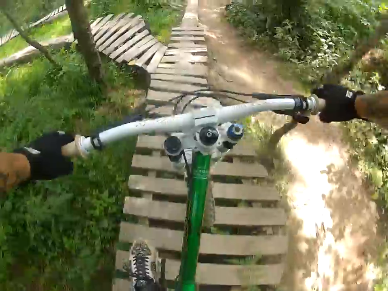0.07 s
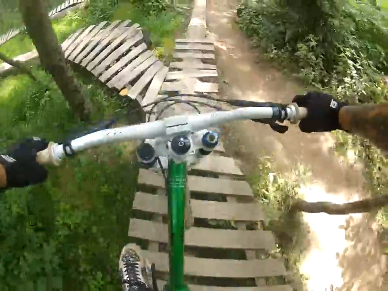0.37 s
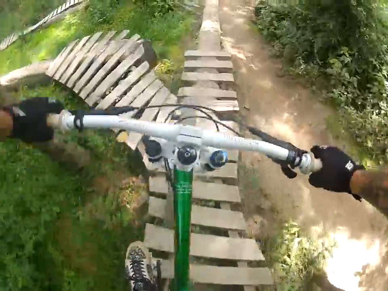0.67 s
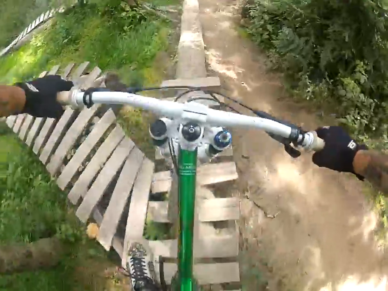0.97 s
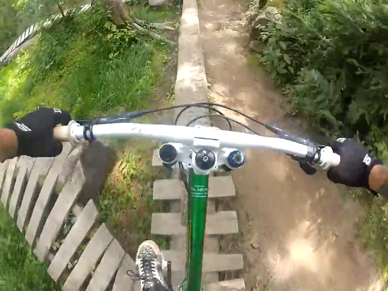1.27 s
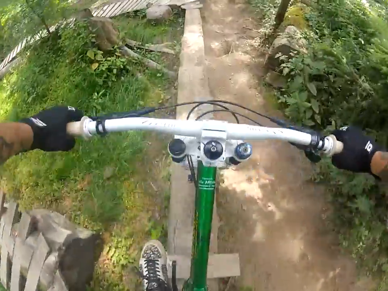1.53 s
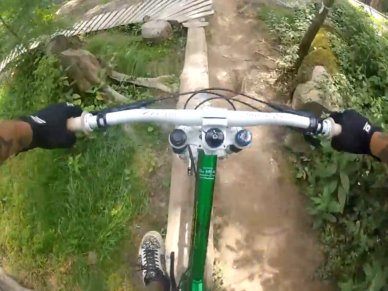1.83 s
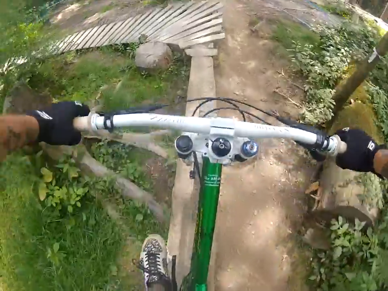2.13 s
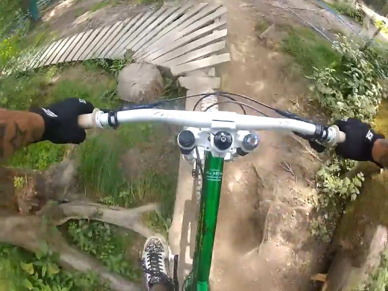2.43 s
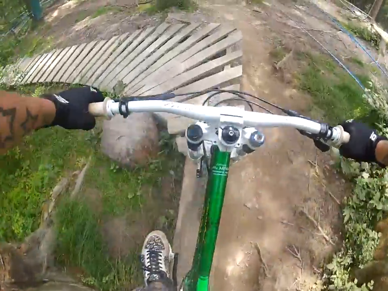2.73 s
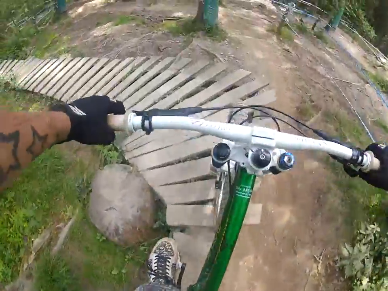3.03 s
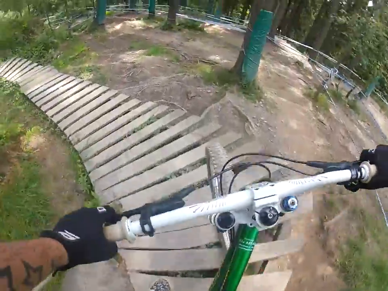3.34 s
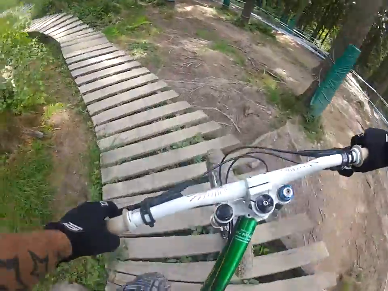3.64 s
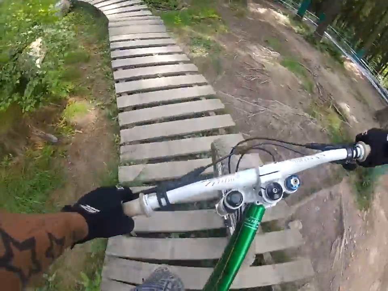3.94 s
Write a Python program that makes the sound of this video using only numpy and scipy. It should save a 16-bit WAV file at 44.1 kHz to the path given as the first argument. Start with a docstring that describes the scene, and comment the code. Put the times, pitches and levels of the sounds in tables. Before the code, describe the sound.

A mountain bike rolls over a slatted wooden bridge and a narrow plank, its tyres droning and scuffing. Irregular knocks, thumps and faint freewheel ticks come throughout, with low wind rumble on a microphone worn by the rider.

```python
"""Mountain bike on a wooden bridge

A bike rolls over slats and a narrow plank, heard from a camera in a closed case on the rider.
Wind and rolling tyres rumble, and the wheels set the boards into damped vibration. Friction and impact
excite resonances: tyres scuff, the chain rasps, the freewheel ticks, metal clinks, bike and mount knock.
The case rings above the bass, and the recorder's sample-and-hold mirrors the sound into the treble."""
import sys
import numpy as np
from scipy.fft import rfft, irfft, next_fast_len
from scipy.io import wavfile
from scipy.ndimage import map_coordinates

SR = 44100
rng = np.random.default_rng(int(sys.argv[2]) if len(sys.argv) > 2 else 0)


def generate_wav(signal):
    """Clip the signal to [-1, 1] and save it as 16-bit WAV at the path in sys.argv[1]."""
    frames = np.transpose(np.atleast_2d(signal))
    scaled = np.clip(frames, -1, 1) * 32767
    pcm = np.round(scaled).astype(np.int16)
    wavfile.write(sys.argv[1], SR, pcm)


N = 176400


def amp(db):
    """Amplitude grows tenfold for every 20 dB."""
    return 10 ** (np.asarray(db) / 20)


def unit(x):
    """Normalisation to an rms of 1."""
    return x / np.sqrt(np.mean(x ** 2) + 1e-20)


def curve(rows):
    """Linear interpolation of (seconds, value) rows at every sample."""
    return np.interp(np.arange(N) / SR, *np.transpose(rows))


def wobble(rate):
    """Smooth random modulation: a spline through rate knots a second."""
    return map_coordinates(rng.standard_normal(int(N * rate / SR) + 4), [np.arange(N) * rate / SR])


def swell(middle, length):
    """A bell-shaped power envelope, its middle and length in seconds."""
    return np.exp(-abs(2 * (np.arange(N) / SR - middle) / length) ** 3)


def filtered(x, response):
    """Linear filtering multiplies the spectrum by a frequency response."""
    n = x.shape[-1]
    padded = next_fast_len(n + n // 4)
    return irfft(rfft(x, padded) * response(np.fft.rfftfreq(padded, 1 / SR)), padded)[..., :n]


def noise(spectrum):
    """Spectral shaping of white noise by (Hz, dB) rows, at an rms of 1."""
    hz, db = np.transpose(spectrum)
    white = rng.standard_normal(N)
    return unit(filtered(white, lambda f: amp(np.interp(np.log(f + 1), np.log(hz), db))))


def resonate(x, modes, steepness=1.67):
    """Parallel resonators of alternating sign, scaled so that white noise keeps its power."""
    def response(f):
        total = sum((-1) ** k * amp(db) * (1j * f * width / (hz * hz - f * f + 1j * f * width))
                    ** steepness for k, (hz, width, db) in enumerate(modes))
        return total / np.sqrt(np.mean(abs(total) ** 2))
    return filtered(x, response)


def add(track, start, sound):
    """Superposition of a sound on the track, from start in seconds."""
    part = track[max(round(start * SR), 0):][:len(sound)]
    part += sound[:len(part)]


def ring_down(t, t60, rise_s):
    """Damping: after a quick rise, the amplitude decays by 60 dB every t60 seconds."""
    return np.exp(-np.log(1000) * t / t60) * (1 - np.exp(-t / rise_s))


def contact(modes, fall_s, tilt=0, pitch=1):
    """Impact excitation: a snap, a crunch and a faint chatter ring the modes; tilt brightens them."""
    t = np.arange(SR // 16) / SR
    snap = 0.73 * (t == 0)
    chatter = 0.15 * np.exp(-t / 0.015)
    crunch = (np.exp(-t / fall_s) + chatter) * rng.standard_normal(len(t))
    force = filtered(snap + crunch / np.linalg.norm(crunch), lambda f: (1j * f / (4990 + 1j * f)) ** tilt)
    ring = resonate(force, [(pitch * hz, width, db) for hz, width, db in modes])
    return ring / np.linalg.norm(ring) * np.sqrt(0.006 * SR)  # the energy of 6 ms at rms 1


def hiss():
    """Stereo difference: faint noise, given opposite signs in the two channels, adds width."""
    spectrum = [(30, -48), (100, -4.5), (600, -1), (1200, -19.5), (2600, -20.5), (3700, -6), (5000, -8)]
    return amp(-77.5) * noise(spectrum)


# Spectrum of the air. Each row: frequency in Hz, relative density in dB.
AIR_SPECTRUM = [(200, -17.5), (450, -2.5), (700, -4), (1100, -4), (1500, -11.5), (2200, -8), (3000, -11.5),
                (4200, -14.5), (5400, -15.5), (6000, -15)]

def air():
    """Broadband noise with slight amplitude modulation makes a soft rush of air."""
    return amp(-63.5 + 0.96 * wobble(18)) * noise(AIR_SPECTRUM)


# Envelopes of the shaking case and the rolling tyres. Each row: time in seconds, relative level in dB.
SHAKE_LEVELS = [(0, -45), (.85, -50), (1.03, -38.5), (1.15, -46), (1.58, -40), (1.75, -47.5), (2.35, -43.5),
                (2.5, -51.5), (2.97, -44), (3.15, -54.5), (3.6, -52), (4, -49)]
ROLL_LEVELS = [(0, -59), (.26, -48), (.36, -56), (.52, -52.5), (.62, -53), (.92, -55.5), (1.03, -49.5),
               (1.15, -54), (1.28, -52), (1.7, -54), (2.1, -56.5), (2.9, -55.5), (3.07, -53), (3.22, -54),
               (3.42, -53.5), (3.65, -58), (3.84, -54), (3.95, -56.5)]
# Their spectra. Each row: frequency in Hz, relative density in dB.
SHAKE_SPECTRUM = [(5, -15), (13, -1.5), (25, -1), (40, -13.5), (60, -13), (100, -28), (250, -71),
                  (600, -120)]
ROLL_SPECTRUM = [(30, -3.5), (70, -4.5), (110, 0.5), (200, -9.5), (270, -10), (400, -19), (1500, -63)]

def rumble():
    """Random forcing: the case shakes in the wind while the tyres drone unevenly over the boards."""
    shake = amp(3.5 + curve(SHAKE_LEVELS)) * noise(SHAKE_SPECTRUM)
    roll = amp(0.5 + curve(ROLL_LEVELS) + 1.2 * wobble(25.95)) * noise(ROLL_SPECTRUM)
    return shake + roll


# Pings of the bike's metal parts. Each row: start in seconds, level in dB.
METAL_PINGS = [(1.43, -57.5), (1.61, -57), (1.958, -54)]

def pings(ring_hz=3940, width_hz=1400):
    """Impacts on light metal parts excite one broad, high resonance, which dies quickly."""
    out = np.zeros(N)
    for start, db in METAL_PINGS:
        add(out, start, amp(db) * contact([(ring_hz, width_hz, 0)], fall_s=0.0065))
    return out


# Modes of struck metal. Each row: frequency in Hz, level in dB, 60 dB decay time in seconds.
CLINK_MODES = [(1750, -43, 0.027), (2320, -40.5, 0.086), (3200, -41, 0.024), (4500, -44, .025),
               (5362, -41.5, 0.03)]

def clink(start=1.9848):
    """Free vibration: metal strikes metal once, and the least damped inharmonic mode sings on."""
    out, t = np.zeros(N), np.arange(SR // 10) / SR
    for hz, db, t60 in CLINK_MODES:
        phase_drift = 0.097 * np.cumsum(rng.standard_normal(len(t)))  # roughens the tone
        tone = np.sin(2 * np.pi * hz * t + phase_drift)
        add(out, start, amp(db) * tone * ring_down(t, t60, rise_s=0.0012))
    return out


# Rasps of the chain. Each row: middle in seconds, length in seconds, level in dB.
CHAIN_RASPS = [(.655, 0.12, -60), (1.3, .034, -55), (1.73, 0.12, -68)]

def chain(ring_hz=3560, width_hz=200):
    """Narrowband resonance: the dense rattle of dragging links drives one metallic mode."""
    power = sum(amp(db) ** 2 * swell(middle, length) for middle, length, db in CHAIN_RASPS)
    links = unit(np.exp(0.28 * wobble(300))) * rng.standard_normal(N)
    return resonate(np.sqrt(power) * links, [(ring_hz, width_hz, 0)])


# Resonances of a pawl's tick. Each row: frequency in Hz, width in Hz, relative gain in dB.
PAWL_MODES = [(1750, 370, -11.5), (2377, 147, 7.5), (3090, 220, -13.5), (4730, 270, -11.5),
              (5300, 370, -16)]
# The clear ticks, and the envelope of the faint ones between. Each row: time in seconds, level in dB.
CLEAR_TICKS = [(.2154, -51.5), (0.2726, -52.5), (1.1262, -55), (2.1784, -56.5), (2.3356, -54),
               (3.9769, -58.5)]
FAINT_TICK_LEVELS = [(.5, -63), (1, -60), (2.1, -63), (3.2, -66), (3.55, -60)]

def freewheel(ticks_per_s=33, spread_db=1.8):
    """A quasi-periodic impulse train: the pawls tick with scatter in timing, level and pitch."""
    jitter, loudness, detunes = rng.standard_normal((200, 3)).T
    times = (np.arange(len(jitter)) + 0.24 * jitter) / ticks_per_s
    levels = np.interp(times, *np.transpose(FAINT_TICK_LEVELS)) + spread_db * loudness
    clear_times = np.array(CLEAR_TICKS)[:, 0]
    faint_ticks = [(start, db) for start, db in zip(times, levels)
                   if abs(start - clear_times).min() > 0.5 / ticks_per_s and start < N / SR]
    out = np.zeros(N)
    for (start, db), detune in zip(CLEAR_TICKS + faint_ticks, detunes):
        add(out, start, amp(db) * contact(PAWL_MODES, fall_s=0.0035, pitch=1 + 0.026 * detune))
    return out


# Resonances of the boards, and of the case in low, middle and high groups.
# Each row: frequency in Hz, width in Hz, relative gain in dB.
BOARD_MODES = [(137, 75, 0.17), (273.7, 120, -1.2)]
CASE_LOW = [(688, 152, 2.5), (896, 180, -8.5), (1144, 300, 2.5)]
CASE_MID = [(1825, 200, 3), (2333, 333, -4.5)]
CASE_HIGH = [(2955, 240, -1.5), (3564, 330, 4), (4520, 78, -14.5), (4990, 780, -9)]
# Scuffs of tyres and gear. Each row: middle in seconds, length in seconds, relative level in dB,
# offsets of the low and high groups in dB.
SCUFF_STROKES = [(0.432, 0.07, -56, -7.5, -10), (0.562, 0.015, -50.5, -4, -11),
                 (0.649, 0.12, -55.5, -3, -7), (0.779, 0.027, -56.5, 0, -3), (0.987, 0.032, -56, 0, -2.5),
                 (1.048, 0.07, -62.5, 1.5, -3), (1.28, 0.084, -57, -2, -9), (1.309, 0.019, -48.5, -5, -14),
                 (1.433, 0.016, -57.5, -1, -3), (1.659, 0.029, -55, -1.5, -7),
                 (1.742, 0.12, -59.5, -2, -7.5), (1.886, 0.05, -60, -1, -3), (2.119, 0.029, -63, 4, 1),
                 (2.333, 0.088, -65.5, 0.5, -2), (2.519, 0.021, -65.5, 9, 3),
                 (2.644, 0.057, -54.5, -1, -26), (2.884, 0.21, -61, -0.5, -5), (3.079, 0.13, -62, 2, -6.5),
                 (3.305, 0.061, -58.5, 1, -7), (3.42, 0.073, -63.5, 5.5, -6.5),
                 (3.817, 0.049, -53, 0, -7.5)]

def scuffs():
    """Friction noise, swelling in strokes over a light steady rub, drives the case and the boards."""
    rub_db = -65.5 + np.array([-7.5, 0, -6.5])  # low, middle and high groups
    trim_db = np.array([-3, -1, 0])
    power = np.outer(amp(rub_db), amp(0.5 * wobble(6.8))) ** 2
    for middle, length, db, low_db, high_db in SCUFF_STROKES:
        group_db = db + trim_db + np.array([low_db, 0, high_db])
        power += np.outer(amp(group_db) ** 2, swell(middle, length))
    envelopes = np.sqrt(power)
    grain = unit(np.exp(0.28 * wobble(500)))
    boom = amp(3) * resonate(envelopes[0] * rng.standard_normal(N), BOARD_MODES)
    case = sum(resonate(envelope * grain * rng.standard_normal(N), modes)
               for envelope, modes in zip(envelopes, (CASE_LOW, CASE_MID, CASE_HIGH)))
    return boom + case


# Knocks of bike and mount. Each row: start in seconds, level of the case's middle group in dB,
# offsets of its low and high groups in dB.
KNOCK_HITS = [(0.4493, -43, -17, -3), (0.5407, -48, -8, -15), (.732, -53.5, -11, -2.5),
              (1.4212, -49, -11, -20), (1.539, -53, -9, -11), (1.5745, -42.5, -3.5, -6),
              (1.954, -46.5, -6, -22), (2.0132, -40, -8.5, -25), (2.023, -61.5, -13, 8),
              (2.2753, -48.5, -7, -13), (2.282, -45.5, -3, -12.5), (2.8172, -49.5, -13, -7),
              (3.0346, -50.5, -10, -3), (3.0615, -36, -5.5, -27), (3.2254, -51.5, -25, -5),
              (3.8842, -45.5, -16, -1)]

def knocks():
    """Impulse response: hard contacts ring the boards and the case, whose high modes add a click."""
    out = np.zeros(N)
    for start, db, low_db, high_db in KNOCK_HITS:
        for modes, offset_db in (BOARD_MODES, low_db - 3), (CASE_LOW, low_db), (CASE_MID, 0):
            add(out, start, amp(db + offset_db) * contact(modes, fall_s=0.0025))
        add(out, start, amp(db + high_db) * contact(CASE_HIGH, fall_s=0.0019, tilt=3.25))
    return out


# Wheel impacts. Each row: start in seconds, level in dB, frequency in Hz, 60 dB decay time in seconds.
WHEEL_THUMPS = [(0.585, -31, 111, 0.059), (0.562, -37.5, 658, 0.036), (1.316, -31.5, 241, 0.052),
                (1.57, -17, 51.6, 0.037), (1.817, -29, 111, 0.058), (2.024, -31, 107, 0.056),
                (2.70, -32.5, 117.6, 0.066), (3.041, -29, 101, 0.037), (3.062, -39, 236, .07),
                (3.081, -22.5, 101.5, 0.059), (3.597, -30.5, 43.8, 0.072), (3.846, -32.5, 156, 0.032)]

def thumps(overtone_ratio=2.6, overtone_db=-14.5):
    """Damped oscillation: a wheel drops on a board, which swings a few times."""
    out, t = np.zeros(N), np.arange(SR // 5) / SR
    for start, db, hz, t60 in WHEEL_THUMPS:
        phase = 2 * np.pi * hz * t
        swing = np.sin(phase) + amp(overtone_db) * np.sin(overtone_ratio * phase)
        add(out, start, amp(db) * swing * ring_down(t, t60, rise_s=0.003))
    return out


def scene():
    """Superposition: the sources sum at one microphone, and only the hiss separates the channels."""
    mid = air() + rumble() + thumps() + knocks() + scuffs() + chain() + freewheel() + pings() + clink()
    side = hiss()
    return np.array([mid + side, mid - side])


def record(dry, band_hz=5700, hold_hz=12000, top_hz=15500):
    """Spectral imaging: sample-and-hold mirrors the band about the hold rate, under a sinc roll-off."""
    band = filtered(dry, lambda f: 1 / np.sqrt(1 + (f / band_hz) ** 80))
    mirrored = band * (1 + 2 * np.cos(2 * np.pi * hold_hz * np.arange(N) / SR))
    return filtered(mirrored, lambda f: np.sinc(f / hold_hz) * (f < top_hz))


dry = scene()
out = record(dry)
generate_wav(out)
```